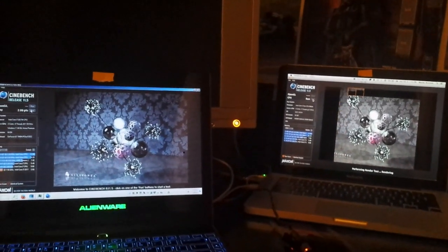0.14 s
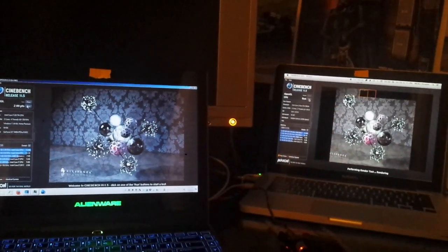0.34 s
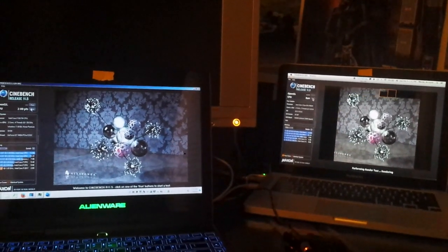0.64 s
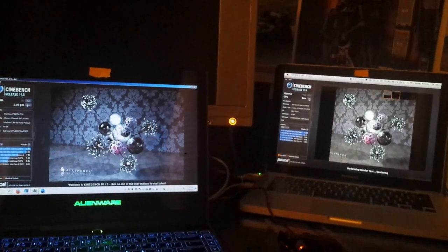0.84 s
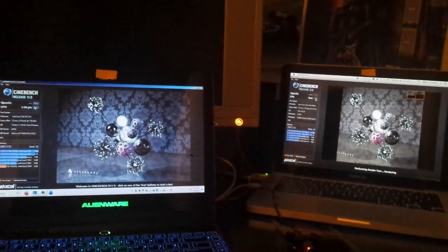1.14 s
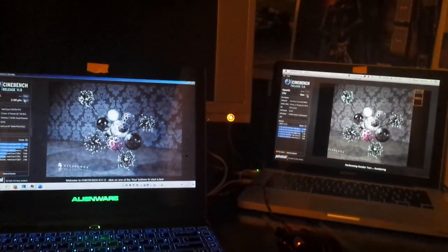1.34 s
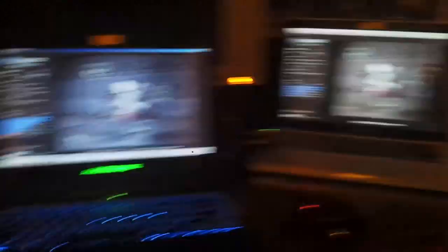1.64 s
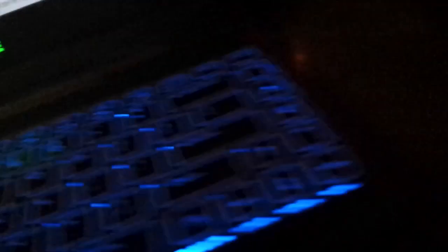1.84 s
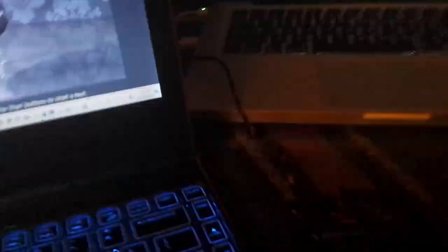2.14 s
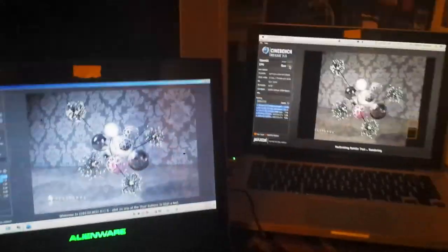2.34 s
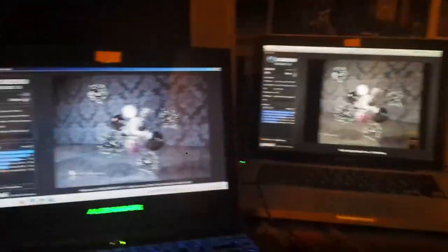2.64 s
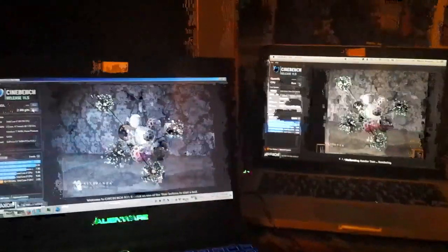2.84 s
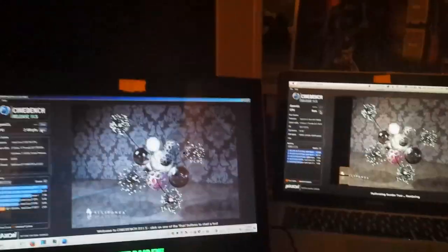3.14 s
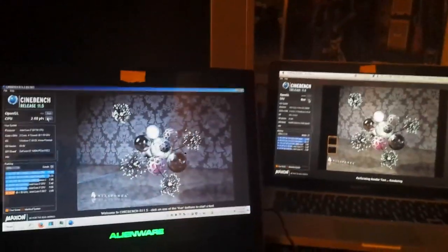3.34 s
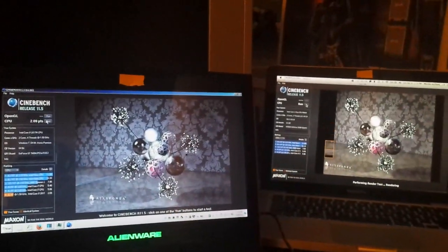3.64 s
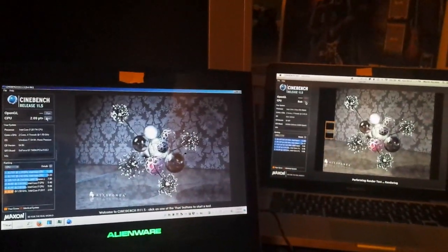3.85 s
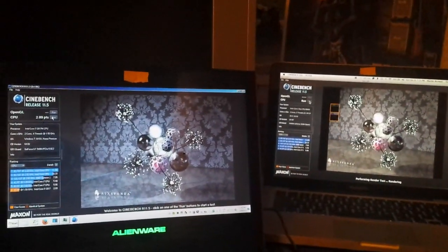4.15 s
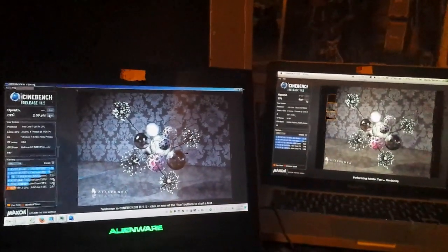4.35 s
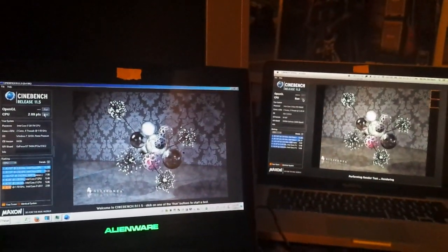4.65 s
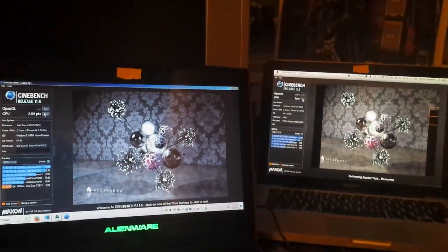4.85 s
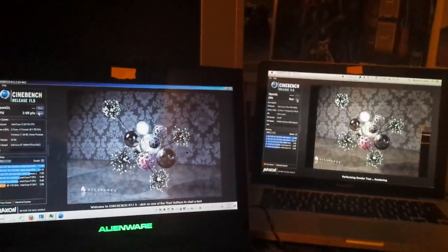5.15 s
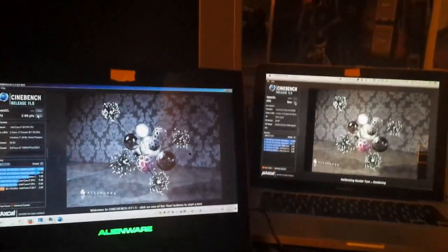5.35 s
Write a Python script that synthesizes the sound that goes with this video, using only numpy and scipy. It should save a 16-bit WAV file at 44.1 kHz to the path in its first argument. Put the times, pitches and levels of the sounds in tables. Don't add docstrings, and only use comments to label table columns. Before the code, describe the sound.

Close, continuous fan air from two laptops in a quiet room, with thin steady motor whines on top. Near two seconds the hand-held camera swings, bringing a dense cluster of plastic ticks, rustling and palm bumps while the whines waver. Then the hiss settles, with stray clicks and a short creak near the end.

```python
import sys
import numpy as np
from scipy import signal
from scipy.io import wavfile
from scipy.ndimage import uniform_filter1d

SR = 44100
rng = np.random.default_rng(int(sys.argv[2]) if len(sys.argv) > 2 else 0)


def gain_from_decibels(decibels):
    exponent = np.asarray(decibels, float) / 20
    return 10 ** exponent


def inscribe(sig):
    pcm = np.round(np.clip(np.atleast_2d(sig).T, -1, 1) * 32767)
    wavfile.write(sys.argv[1], SR, pcm.astype(np.int16))


N = 242991
T = np.arange(N) / SR

# (time [s], turned away [0-1], moved back [0-1], bearing of the near motor L-R [dB])
SWING = [(0, 0, 0, -3), (1.7, 0, 0, -3), (1.81, .35, 0, 3), (1.92, .7, .65, 5), (2.05, 1, 1.1, 5.5),
         (2.19, .85, .9, 7), (2.29, .6, .95, -7), (2.41, .2, 1.1, -8), (2.5, -.1, .95, -6),
         (2.75, 0, 1, -5), (5.51, 0, 1, -4.5)]


def evened(x):
    return x / np.sqrt(np.mean(x ** 2) + 1e-20)


def read(points, hz):
    f, value = np.transpose(points)
    return np.interp(np.log(hz + 1), np.log(f + 1), value)


def curves(rows, t):
    s, *columns = np.transpose(rows)
    return [np.interp(t, s, column) for column in columns]


def drift(low_hz, top_hz, t):
    rates = np.geomspace(low_hz, top_hz, num=16)
    return evened(sum(np.sin(2 * np.pi * (f * t + rng.random())) / np.sqrt(f) for f in rates))


def after_swing(t):
    return np.clip((t - 1.8) / .5, 0, 1)


def placed(x, pan_db, lead=0.):
    left = x * gain_from_decibels(pan_db / 2) * np.exp(.5j * lead)
    right = x * gain_from_decibels(-pan_db / 2) * np.exp(-.5j * lead)
    return np.array([left.real, right.real])


def tone(turns, db):
    return np.sqrt(2) * gain_from_decibels(db) * np.exp(2j * np.pi * turns)


def resonator(x, hz, width):
    r = np.exp(-np.pi * width / SR)
    angle = 2 * np.pi * hz / SR
    return signal.lfilter([0, np.sin(angle)], [1, -2 * r * np.cos(angle), r * r], x)


def hump(hz, centre_hz, width):
    return 1 / (1 + ((hz - centre_hz) / (width / 2)) ** 2) ** 2


def ticks(rows, t60, snap_db, spread, length):
    out, t = np.zeros((2, N)), np.arange(round(length * SR)) / SR
    u = (t - .0002) / .000058
    for (s, db, hz, pan_db), noise in zip(rows, rng.standard_normal((len(rows), len(t)))):
        decay = gain_from_decibels(-60 * t / t60) * (1 - np.exp(-t * hz * 2.5))
        sagging_t = t + .3 / hz * (1 - np.exp(-t * hz))
        modes = np.sin(2 * np.pi * hz * sagging_t) + .3 * np.sin(2 * np.pi * hz * spread * t)
        scatter = .1 * evened(resonator(noise, hz, hz * .8)) * gain_from_decibels(-60 * t / (3 * t60))
        grit = .2 * resonator(noise, 5500, 5000) * np.exp(-t / .0015)
        snap = u * np.exp(-u ** 2 / 2) + grit
        body = modes * decay + scatter
        sound = gain_from_decibels(db) * (body / abs(body).max() + gain_from_decibels(min(snap_db, -1)) * snap / abs(snap).max())
        part = out[:, round((s + .0008) * SR):][:, :len(t)]
        part += placed(sound, np.clip(pan_db, -9, 9))[:, :part.shape[1]]
    return out


def palm_thumps():
    # (time [s], peak level [dB], ring [Hz])
    palm_hits = [(0.391, -56, 306), (0.779, -49.5, 280), (1.09, -48, 290), (1.253, -40, 294),
                 (1.336, -49, 363), (1.524, -50, 306), (1.605, -39, 293), (1.842, -51, 330),
                 (2.011, -50, 402), (2.096, -33, 310), (2.17, -42, 305), (2.321, -49, 325),
                 (2.465, -45, 384), (2.623, -47, 300), (4.672, -52, 394)]
    thumps = ticks([(*row, 2) for row in palm_hits], .072, -40, spread=1.25, length=.15)
    return signal.sosfilt(signal.butter(3, 220, "high", fs=SR, output="sos"), thumps)


def case_ticks():
    # (time [s], peak level [dB], ring [Hz], L-R [dB])
    dull = [
        (1.409, -43, 950, 9),
        (1.89, -34.5, 950, 5),
        (1.947, -46, 1030, 9),
        (1.971, -31, 980, -1),
        (2.023, -25, 875, -5),
        (2.501, -48, 1320, 9),
        (3.139, -48, 1300, 7.5),
    ]
    sharp = [
        (2.027, -28, 1630, 9),
        (2.053, -31, 2510, 9),
        (2.137, -45, 1850, 1),
        (2.15, -42, 2960, 3),
        (2.209, -48, 1800, 3),
        (2.51, -37, 1610, 9),
        (2.152, -46, 2960, 0),
        (2.587, -38, 2850, 11),
        (4.598, -31, 1590, 0),
    ]
    snaps = [
        (2.5, -46, 4260, 2),
        (2.5, -46, 9300, 1.5),
    ]
    cracks = [
        (2.4661, -45, 1050, -7),
        (2.5485, -42, 1300, 9),
        (2.6160, -42, 1100, 7),
        (3.1465, -35, 1400, 3),
        (4.8287, -30, 2800, .5),
    ]
    # (rows, t60 [s], snap over the ring [dB])
    kinds = [(dull, .009, -12), (sharp, .0092, -9), (snaps, .014, -20), (cracks, .005, -3)]
    return sum(ticks(*kind, spread=1.57, length=.036) for kind in kinds)


def rustle():
    # (time [s], length [s], level [dB], case colour [Hz])
    rubs = [(1.888, 0.009, -46, 1080), (1.952, 0.046, -47, 2710), (1.981, 0.078, -49.5, 1000),
            (2.417, 0.086, -53, 2870), (2.463, 0.028, -50, 970), (2.518, 0.031, -48.5, 2010),
            (2.544, 0.036, -47.5, 2600), (2.598, 0.027, -50.5, 2530), (2.62, 0.02, -53, 1500),
            (3.138, 0.01, -49, 1550), (4.673, 0.027, -49.5, 2620)]
    # (time [s], length [s], level [dB], case colour [Hz], fizz colour [Hz])
    scrapes = [(1.706, 0.06, -53, 2000, 6000), (1.753, 0.049, -54, 2800, 6000),
               (1.946, 0.0078, -48, 1500, 9500), (2.028, 0.0091, -54, 1500, 7900),
               (2.047, 0.023, -45.5, 2960, 7760), (2.057, 0.029, -51.5, 2540, 12600),
               (2.068, 0.012, -48.5, 1220, 7800), (2.135, 0.0076, -48, 1890, 10600),
               (2.146, 0.017, -51, 2510, 7000), (2.212, 0.011, -50, 2040, 10100),
               (2.506, 0.0096, -48.5, 1800, 6650), (4.597, 0.0083, -51, 2500, 6500),
               (4.818, 0.041, -57.5, 3000, 6300)]
    out = np.zeros((2, N))
    unevenness = gain_from_decibels(2.8 * np.minimum(rng.exponential(1, N), 3.5))
    slips = rng.random(N) < 7500 / SR
    grains = rng.standard_normal((3, N)) * unevenness * slips
    grains = grains[0] + 1.13 * grains[1:]
    strokes = [(*row, 7340, -4) for row in rubs]
    strokes += [(*row, 2) for row in scrapes]
    for s, length, db, hz, fizz_hz, fizz_db in strokes:
        part = out[:, round(s * SR):round((s + length) * SR) + 400]
        u = np.arange(part.shape[1]) / (length * SR)
        pressure = np.clip(np.minimum(u / 0.096, (1 - u) / .5), 0, 1)
        stroke = grains[:, round(s * SR):][:, :len(u)] * pressure
        fizz = resonator(resonator(stroke, fizz_hz, 1.7 * fizz_hz), fizz_hz, 1.7 * fizz_hz)
        part += gain_from_decibels(db) * (evened(resonator(stroke, hz, 0.54 * hz)) + gain_from_decibels(fizz_db) * evened(fizz))
    return out


def creak():
    # (time [s], slip rate [Hz], level [dB])
    slip_run = [
        (4.7288, 770, -13.5),
        (4.73, 715, -18.5),
        (4.732, 660, -13.5),
        (4.7335, 640, -11.5),
        (4.735, 620, -16),
        (4.7415, 590, -18),
        (4.742, 330, -20),
        (4.7455, 330, -31),
    ]
    # (frequency [Hz], width [Hz], level [dB])
    case_modes = [(1510, 200, 2.5), (1800, 410, -6.5), (1040, 310, -42), (590, 130, -38)]
    rate, level_db = curves(slip_run, T)
    colour = (rate / 610) ** .35
    on = (T >= slip_run[0][0]) & (T < slip_run[-1][0])
    slip_count = np.ceil(np.cumsum(rate * on) / SR)
    out, push = np.zeros(N), signal.windows.hann(9) / 4
    for at in np.flatnonzero(np.diff(slip_count, prepend=0)):
        slip = np.pad(push, (0, 600)) * gain_from_decibels(level_db[at] + 0.8 * rng.standard_normal())
        rung = sum(gain_from_decibels(db) * resonator(slip, hz * colour[at], w) for hz, w, db in case_modes)
        out[at:at + len(slip)] += rung
    out = signal.sosfilt(signal.butter(2, [620, 2500], "band", fs=SR, output="sos"), out)
    return placed(-.8 * out, 1.0)


def pops():
    # (time [s], peak level [dB], ring [Hz], swell [ms], L-R
    # [dB])
    flexes = [(1.409, -46.5, 650, 1.8, 17), (1.6985, -39, 850, 1.1, 6), (1.7064, -36, 3000, .4, 0),
              (1.7745, -37, 5500, .4, 0), (1.8365, -37, 597, 1.1, 1), (1.8385, -29.5, 950, 1.1, 3),
              (1.8415, -35, 820, 1.3, 4), (1.889, -40, 1660, 1.4, 16), (1.892, -43, 605, 1.7, 0),
              (1.9475, -35, 1760, 1.9, 1), (1.948, -41, 655, 2.2, 1), (1.9595, -36, 786, 2.1, 5),
              (1.9645, -38, 4540, 2.6, 2), (1.969, -35, 4450, 2.3, 2), (1.9665, -37, 2510, 1.3, 1),
              (1.98, -39, 1680, 2.4, 1), (1.986, -38, 7200, 1.6, 6), (2.004, -36, 2410, 2.2, 1),
              (2.0228, -31, 8000, 0.33, 3), (2.0235, -33.5, 850, 1.8, -3), (2.0283, -28.5, 3800, 0.39, 9),
              (2.0462, -32.5, 8200, 0.99, -5), (2.051, -30, 7800, 0.83, -5), (2.0595, -35, 12500, .6, 0),
              (2.0635, -33, 12250, 1.3, -2), (2.0635, -30.5, 2560, 1.1, 0), (2.0655, -30.5, 1000, 0.94, 2),
              (2.099, -49, 3200, 2, -1), (2.136, -41, 10500, 1, 1), (2.2095, -35.5, 10100, 1, 1.5),
              (2.211, -61, 1850, 1.5, 1),
              (2.4425, -36, 3000, .5, 0), (2.477, -43, 600, 1.7, -7), (2.5, -38, 900, 0.76, 14),
                   (2.529, -36, 2000, 0.54, 13), (2.535, -37, 1700, 0.92, 3), (2.552, -43, 6500, .8, 7),
                   (2.603, -35, 1080, 0.29, 19), (2.662, -43, 1100, 0.89, 15), (4.5985, -34, 6000, .4, 2),
                   (4.6758, -25.5, 2780, 0.3, 0), (4.6764, -31, 2280, 1, 0), (4.6765, -34, 510, 0.82, 3),
                   (4.681, -34, 1600, 1.5, 0), (4.688, -36, 2220, 1.5, -1), (4.691, -40, 2000, 1.2, -1),
                   (4.8223, -26, 7700, 0.23, .5), (4.822, -28, 1460, 2, 0), (4.8386, -34, 3800, 0.48, .5),
              (1.68425, -19, 1100, .55, 3), (1.8353, -12, 2200, .54, .5), (1.8366, -21, 1500, .5, 5),
                  (1.8366, -30, 5200, .4, 1), (1.8374, -26, 2600, .5, 3), (1.8385, -32, 3400, .8, 1),
                  (1.84, -28, 1760, .6, 1), (1.8362, -25, 3600, .25, 1), (2.1365, -32, 4300, .6, 1),
                  (2.137, -32, 1900, 1.5, 1), (2.1511, -29, 3000, .55, 2), (2.2105, -32, 4300, .35, 1),
                  (2.2105, -36, 6200, .4, 1), (2.2115, -35, 1850, 2, 1), (1.9483, -35, 9800, .5, 1),
                  (4.6759, -28, 3000, .15, 0), (4.8211, -29, 9000, .06, .5), (3.14, -36, 1500, .9, 4),
                  (4.8211, -21, 2800, .2, .5), (4.8224, -19, 2800, .2, .5), (2.9465, -38, 9900, .5, 2),
                  (3.2753, -37, 10300, .8, 2.5), (3.53, -41, 10200, .8, 1.5), (4.8215, -36, 700, .8, 0),
                  (4.739, -33, 975, 4.5, 1), (1.253, -46, 400, 4, 2), (1.523, -47, 410, 4, 2),
                  (1.605, -40, 420, 4, 2), (2.096, -38, 420, 3.5, 2), (2.322, -47, 410, 4, 2)]
    out, t = np.zeros((2, N)), np.arange(round(.02 * SR)) / SR
    for s, db, hz, swell_ms, pan_db in flexes:
        u = t / (swell_ms / 1000)
        sound = gain_from_decibels(db) * (u * np.exp(1 - u)) ** 2 * np.sin(2 * np.pi * hz * t)
        out[:, round(s * SR):][:, :len(t)] += placed(sound, pan_db)
    return out


def port_ticks():
    # (time [s], peak level [dB], ring [Hz], port [1 left, -1 right], snap over the ring [dB])
    near_snaps = [(1.3325, -36, 600, 1, -6), (1.34, -38, 480, 1, -6), (1.68425, -14, 1250, -1, 2),
                  (2.3285, -38, 700, 1, -6), (2.3462, -33, 1000, 1, -6), (2.4675, -19.5, 1000, -1, -4),
                  (2.5103, -28, 1500, 1, -2), (2.5492, -23, 1400, 1, -2), (2.6171, -17.5, 1150, 1, -2),
                  (3.11095, -17, 1000, 1, 2), (5.314, -35, 1500, 1, 0), (5.3248, -33.5, 1100, 1, 0),
                  (5.3296, -33, 2000, 1, 0), (5.3365, -37, 1300, 1, 0), (5.356, -37, 1000, 1, 0),
                  (5.363, -37, 1200, 1, 0)]
    ring_s, snap_s, far_port_db = .0007, .000038, -17
    out, t = np.zeros((2, N)), np.arange(-20, 300) / SR
    snap = np.exp(-((t + 3 * snap_s) / snap_s) ** 2)
    rise = np.clip(t / (2 * snap_s) + 1, 0, 1)
    for s, db, hz, port, snap_db in near_snaps:
        hollow = rise * np.cos(2 * np.pi * hz * t) * np.exp(-t / ring_s)
        sound = port * gain_from_decibels(db) * (hollow - gain_from_decibels(snap_db) * snap)
        gains = [1, gain_from_decibels(far_port_db)][::port]
        out[:, round(s * SR) - 20:][:, :len(t)] += np.outer(gains, sound)
    return out


def handling():
    contact = case_ticks() + rustle() + creak() + pops()
    return signal.sosfilt(signal.butter(2, 350, "high", fs=SR, output="sos"), contact)


def whine_levels():
    # (level near [dB], level far [dB], change when turned away [dB])
    whine_rows = [
        (-57, -59.3, -7),
        (-48.3, -57.4, 0),
        (-64.5, -63.5, 0),
        (-65, -65, -2),
        (-46.8, -49.4, -9),
        (-49.4, -51, -2),
    ]
    # (time [s], row of the whine, change [dB], half width [s])
    crossings = [(1.72, 0, 3, .12), (1.95, 1, 3, .1), (2.11, 0, -5, .09), (1.8, 2, 3, .18),
                 (2.2, 2, 2.5, .1), (2.53, 2, 3, .12), (4.2, 2, 2.5, .3), (2.6, 3, 4, .12),
                 (1.92, 4, -8, .05), (2.02, 4, -10, .05), (2.24, 4, -7, .05), (2.34, 4, -2, .06),
                 (1.81, 5, -12, .045), (1.88, 5, -1, .06), (1.97, 5, -7, .05), (2.24, 5, -10, .05),
                 (2.3, 5, -4, .08), (3.3, 5, -2, .25)]
    away, back, _ = curves(SWING, T)
    levels = np.array([near + (rear - near) * back + lost * away for near, rear, lost in whine_rows])
    for s, row, db, half in crossings:
        levels[row] += db * np.clip(1 - abs(T - s) / half, 0, 1)
    return levels


def whines():
    # (multiple, level near [dB], level far [dB])
    rotor_orders = [(2, -74, -77), (10, -74, -72), (15, -80, -73), (17, -82, -76), (19, -82, -76),
                    (20, -75, -82), (30, -68, -80)]
    # (multiple, level near [dB], level far [dB])
    supply_orders = [(3, -66, -67), (4, -68, -76), (5, -76, -68), (6, -68, -70), (8, -66, -71)]
    # (frequency [Hz], level near [dB], level far [dB])
    whistles = [(474, -74, -74), (5013, -66, -74), (5972, -75, -73), (6572, -68, -77), (7192, -75, -80),
                (7536, -85, -79), (9918, -78, -78), (11364, -76, -85)]
    # (time [s], phase ahead of an 11.5 Hz beat [turns])
    beat_phase = [(0, -.29), (.8, -.1), (1.6, -.07), (2.25, -1.15), (3.25, -1.18), (5.51, -1.52)]
    # (time [s], frequency [Hz], level [dB])
    settling_fan = [
        (4.07, 925, -85),
        (4.1, 912, -62),
        (4.21, 826, -61),
        (4.26, 813.2, -63),
        (5.51, 813.2, -64),
    ]
    rotor_hz, supply_hz, small_hz = 311.85, 480.02, 826.65
    lower, upper, small, hum, fifth, top = whine_levels()
    fifth_pan = curves(SWING, T)[2]

    swing = np.exp(-((T - 2.05) / 0.38) ** 2)
    speed = 1 - 0.000409 * (1 - after_swing(T)) + 0.0003 * drift(0.2745, 7.3, T)
    speed += 0.001 * swing * drift(2.03, 20.3, T)
    rotor = np.cumsum(rotor_hz * speed) / SR
    supply = supply_hz * T

    out = placed(tone(rotor, hum), 1.5)
    out += placed(tone(13 * rotor, top + .7 + .9 * drift(5, 50, T)), 0.1)
    fifth_lead = -0.76 - 1.3 * np.exp(-((T - 2.3) / 0.095) ** 2)
    out += placed(tone(5 * rotor, fifth + 0.68 + 0.12 * drift(5.0, 30, T)), fifth_pan, lead=fifth_lead)
    upper_turns = 2 * supply + 11.5 * T + curves(beat_phase, T)[0]
    out += placed(tone(2 * supply, lower + .8) + tone(upper_turns, upper + 1.2), 1.5, lead=.1)

    settle_hz, settle_db = curves(settling_fan, T)
    gap = np.cumsum(small_hz - settle_hz) / SR
    gap += .04 - gap[round(4.3 * SR)]
    started = T > settling_fan[0][0]
    out += placed(tone(small_hz * T, small), 1.0)
    out += placed(tone(small_hz * T - gap, settle_db) * started, .8)

    faint = [(k * rotor, a, b) for k, a, b in rotor_orders]
    faint += [(k * supply, a, b) for k, a, b in supply_orders]
    faint += [(f * T + 0.29 * drift(0.297, 4.6, T), a, b) for f, a, b in whistles]
    for turns, near_db, far_db in faint:
        level_db = near_db + (far_db - near_db) * after_swing(T) + 1.2 * drift(.3, 4, T)
        out += placed(tone(turns, level_db), rng.uniform(-0.94, 11.0), lead=rng.uniform(-1.3, 1))
    return out


def air():
    # (frequency [Hz], density [dB per Hz])
    near_spectrum = [(15, -40), (55, -37), (130, -36), (250, -28), (400, -21), (800, -21), (1200, -20),
                     (1600, -12.5), (2600, -12), (3500, -18), (4400, -18), (8000, -19.5), (12000, -18),
                     (16000, -23.5)]
    # (frequency [Hz], density [dB per Hz])
    far_spectrum = [(15, -40), (55, -38), (130, -43.5), (250, -26.5), (400, -18.5), (800, -19),
                    (1200, -19.5), (1600, -12.5), (2600, -12), (3500, -12.5), (4400, -19), (8000, -21.5),
                    (12000, -21.5), (16000, -22.5)]
    # (frequency [Hz], width [Hz], height near [dB], height far [dB])
    vents = [(299, 53, 5.5, 0.5), (612, 170, 5.5, 1.5), (1048, 340, 9, 8), (1337, 59, 5.5, 1.5),
             (1700, 350, -1, 2), (1850, 180, 3, 2.5), (2000, 126, -9.5, -14), (2280, 68, 5.5, 4.5),
             (2615, 320, 4, 4), (3200, 330, -4, -5.5), (3800, 350, 2, -3.5), (3850, 340, 4.5, 3),
             (4870, 270, -2.5, -3.5), (5580, 170, 0, 4), (7940, 280, -2, 1), (14700, 700, 5, 1)]
    # (frequency [Hz], side minus mid [dB])
    side_width = [(60, 0), (110, -5), (200, -4), (300, -9), (600, -3), (1290, -7.5), (2100, -11),
                  (3000, -5), (3900, -13), (4500, -12), (5300, -5), (8120, -3), (15000, -2.5)]
    # (frequency [Hz], L-R [dB])
    port_lean = [(30, 2.5), (120, 3), (300, 1.8), (950, 1), (3800, 1), (15000, .8)]
    # (time [s], level [dB])
    flow_level = [(0, -49.5), (.5, -49.5), (1, -49.5), (1.5, -49.5), (1.8, -48.5), (2.05, -45), (2.25, -50),
                  (2.6, -50), (2.8, -52), (3.05, -51), (3.3, -52), (4.3, -50.5), (4.7, -51), (5.1, -53),
                  (5.51, -50.5)]
    # (frequency [Hz], phase [rad])
    turn_near = [(1000, 0), (3000, .5), (6000, .3), (7500, 1.2), (8500, 2.4), (11000, 3.4), (15000, 4.4)]
    # (frequency [Hz], phase [rad])
    turn_far = [(1000, 0), (3000, .4), (6500, 0), (7500, .6), (8500, 2.4), (9500, 4.7), (10500, 6.3),
                (15000, 3.6)]
    frames, hz = N // 256 + 5, np.fft.rfftfreq(1024, 1 / SR)
    t = np.arange(frames) * 256 / SR
    moved = after_swing(t)
    a, b, c, d, patches = rng.standard_normal((frames, 513, 5)).T
    patches = uniform_filter1d(patches, size=14, axis=0)
    patches = evened(uniform_filter1d(patches, size=12, axis=1))

    humps = [hump(hz, f, w) for f, w, _, _ in vents]
    near = read(near_spectrum, hz) + np.array(vents)[:, 2] @ humps
    away = read(far_spectrum, hz) + np.array(vents)[:, 3] @ humps
    band = (hz > 1700) & (hz < 3700)
    near, away = (s - 10 * np.log10(np.sum(gain_from_decibels(2 * s[band]))) for s in (near, away))

    level_db = curves(flow_level, t)[0]
    hiss_db = -0.74 + (2 + 0.74) * moved
    stir_s = 2.5
    stir = np.exp(-((t - stir_s) / np.where(t < stir_s, 0.6, 0.4)) ** 2)
    rumble_db = 8.5 + 5.5 * stir
    field = np.outer(near, 1 - moved) + np.outer(away, moved)
    field += level_db + 1.0 * patches + .45 * drift(3, 30, t)
    field += np.outer(1 / (1 + (5000 / (hz + 1)) ** 4), hiss_db + 0.66 * drift(4, 40, t))
    field += np.outer(1 / (1 + (hz / 250) ** 4), rumble_db + 1.5 * drift(4, 37, t))
    echo_shift = hump(hz, 3140, 500) * 10.0 - hump(hz, 2400, 650) * 12.0
    field += np.outer(echo_shift, curves(SWING, t)[0])
    field += 2.2 * patches * hump(hz, 127, 120)[:, None]

    mid = (a + 1j * b) * gain_from_decibels(field)
    side = (c + 1j * d) * gain_from_decibels(field + read(side_width, hz)[:, None])
    phase = np.outer(read(turn_near, hz), 1 - moved) + np.outer(read(turn_far, hz), moved)
    lean = gain_from_decibels(read(port_lean, hz)[:, None] / 2)
    ports = np.array([(mid + side) * lean, (mid - side) / lean * np.exp(1j * phase)])
    return signal.istft(ports, nperseg=1024, noverlap=768)[1][:, :N]


def scene():
    touch = handling() + palm_thumps() + port_ticks()
    return touch + whines() + gain_from_decibels(1.0) * air()


def top_cut(x):
    return signal.sosfilt(signal.butter(12, 15870, fs=SR, output="sos"), x)


def record(dry):
    low_pass = signal.firwin(1501, 15810, window=("kaiser", 9), fs=SR)
    limited = signal.oaconvolve(dry, low_pass[None], "same")
    return top_cut(limited - .001)


dry = scene()
out = record(dry)
inscribe(out)
```